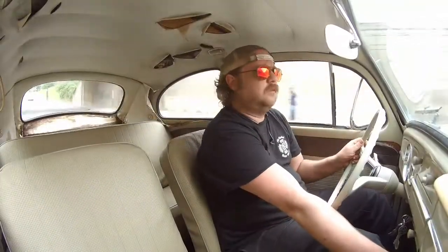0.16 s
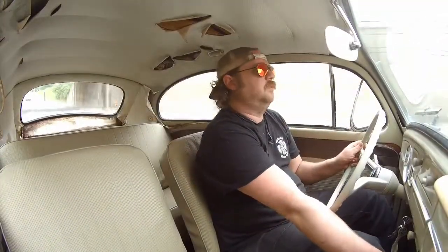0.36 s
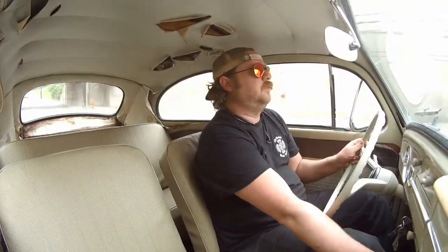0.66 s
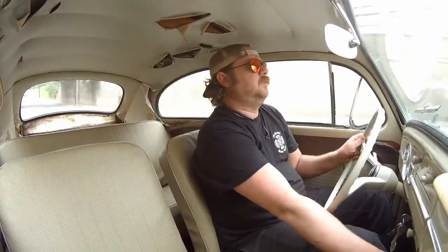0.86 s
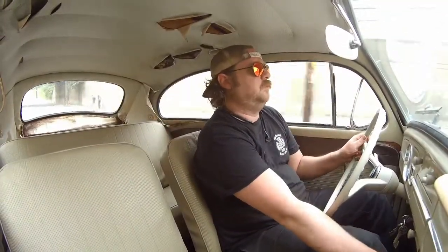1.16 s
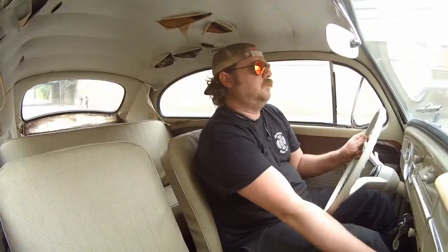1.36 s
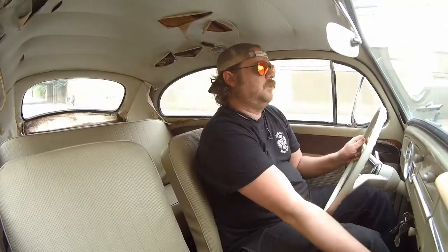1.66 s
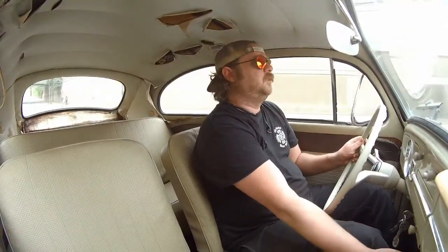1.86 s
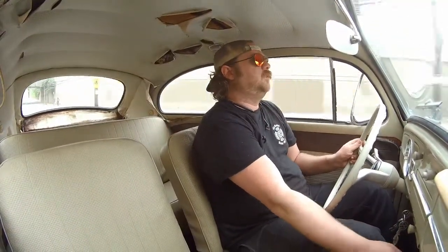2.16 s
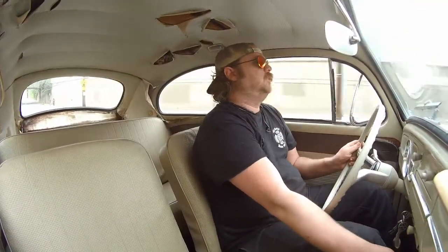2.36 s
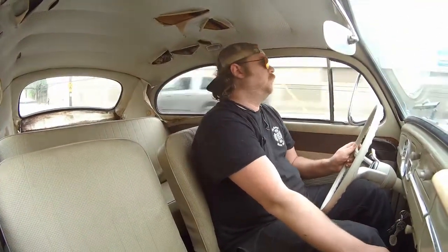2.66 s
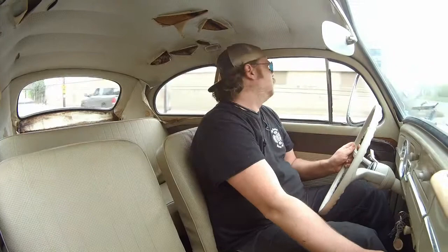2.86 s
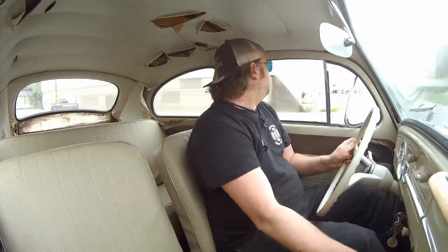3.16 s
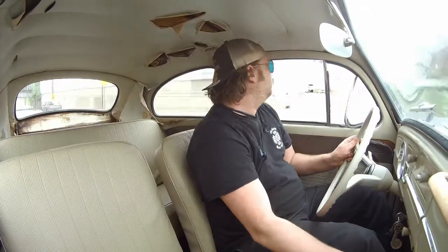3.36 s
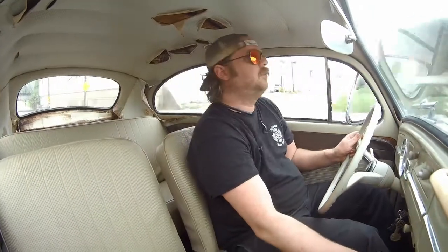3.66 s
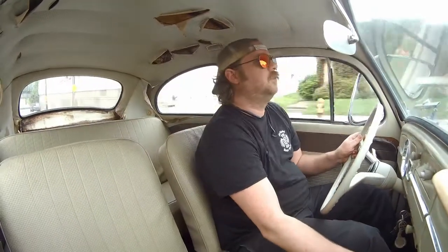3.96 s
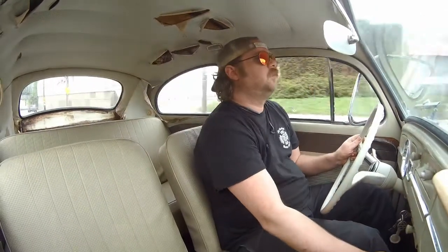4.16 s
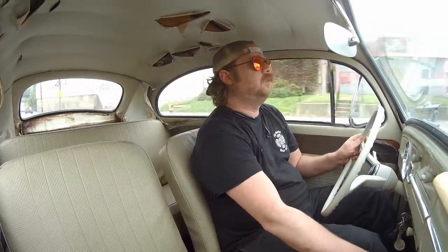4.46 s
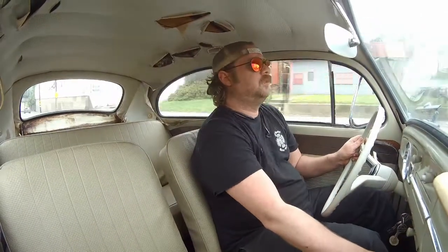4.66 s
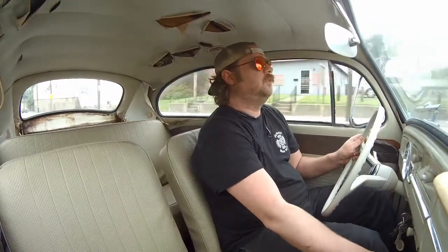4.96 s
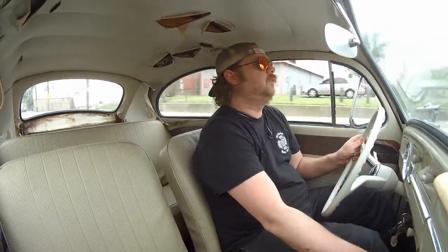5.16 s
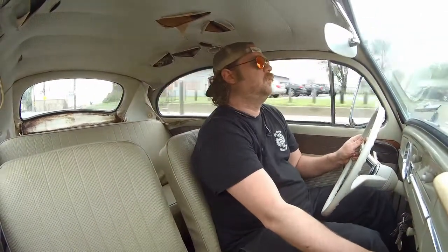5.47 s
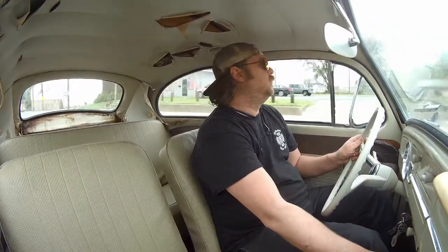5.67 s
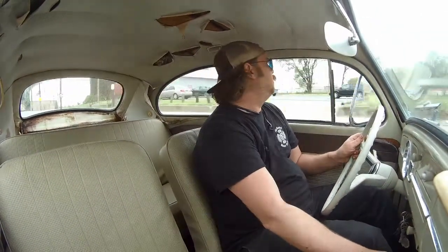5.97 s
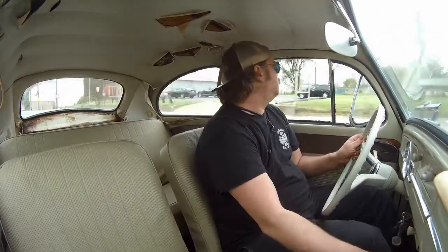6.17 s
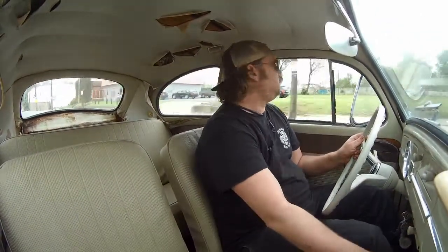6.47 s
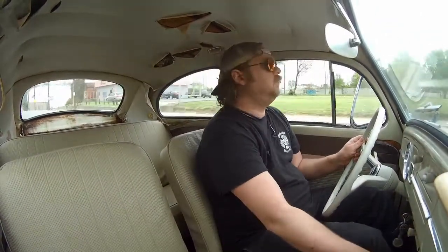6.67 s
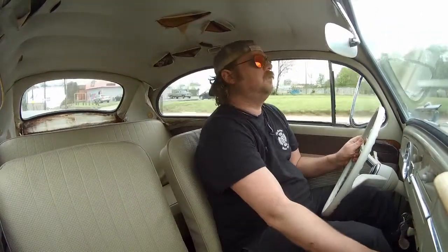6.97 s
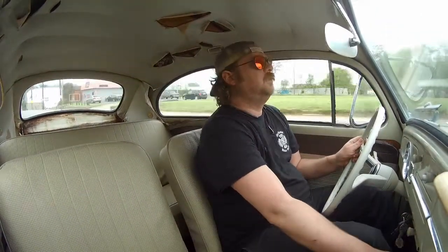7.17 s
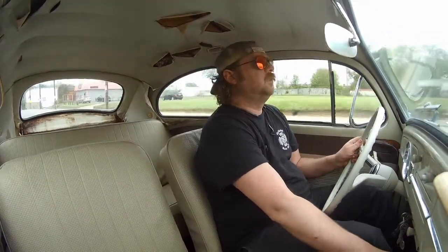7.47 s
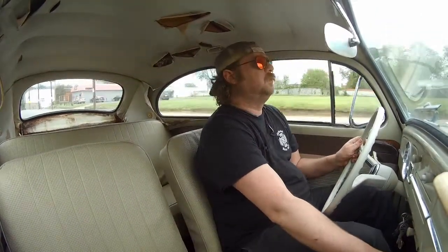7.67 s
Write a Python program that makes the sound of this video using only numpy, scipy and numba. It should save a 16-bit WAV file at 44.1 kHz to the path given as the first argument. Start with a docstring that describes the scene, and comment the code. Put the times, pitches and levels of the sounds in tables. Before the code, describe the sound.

Inside an old air-cooled car at road speed, low wind buffeting and tyre roar surround a droning engine that eases down in pitch.

```python
"""Inside an old air-cooled car at road speed: buffeting wind, tyre roar and window hiss, all filtered noise.
The flat-four, sines on orders of its cycle, cruises to 2.7 s, coasts losing revs, pulls lightly and lumpily
from 4.2 s, then coasts down smoothly from 5.8 s to the end; a thin whine follows its speed throughout.
Up to 3.2 s pressure surges now and then pin the microphone and fine detail drops out for a few ms.
Roar and hiss swell as walls, verges and traffic go by, and dip briefly together."""
import sys
import numpy as np
from scipy import signal
from scipy.fft import rfft, irfft, next_fast_len
from scipy.io import wavfile
from scipy.ndimage import uniform_filter1d
from numba import njit

SR = 44100
rng = np.random.default_rng(int(sys.argv[2]) if len(sys.argv) > 2 else 0)


def store_pcm(level_fs):
    """Save levels as 16-bit WAV."""
    pcm = np.round(np.clip(level_fs, -1, 1) * 32767).astype(np.int16)
    wavfile.write(sys.argv[1], SR, np.atleast_2d(pcm).T)


N = 345303


def undb(db):
    """Decibels to amplitude gain."""
    return 10 ** (np.asarray(db) / 20)


def curves(table):
    """Each column of a table after its time column, interpolated sample by sample."""
    time_s, *columns = np.transpose(table)
    return [np.interp(np.arange(N) / SR, time_s, column) for column in columns]


def walk(rate_hz, step=1):
    """Random levels held 1 / rate_hz and slewed twice; spread 1; one value every step samples."""
    hold = int(SR / step / rate_hz)
    count = len(range(0, N, step))
    held = np.repeat(rng.standard_normal(count // hold + 1), hold)
    slewed = uniform_filter1d(uniform_filter1d(held, hold), hold)[:count]
    return slewed / slewed.std()


def lift(hz, rings):
    """Summed dB lift of a set of resonances."""
    return sum(lift_db / (1 + (2 * (hz - ring_hz) / width_hz) ** 2) for ring_hz, width_hz, lift_db in rings)


def noise(colour, flicker_db, rate_hz, rings=()):
    """Coloured noise of rms 1 in overlapping octave bands that each flicker alone."""
    size = next_fast_len(N)
    hz = np.arange(1, size // 2 + 2) * SR / size
    colour_hz, colour_db = np.array(colour).T
    db = np.interp(np.log(hz), np.log(colour_hz), colour_db, left=-99, right=-99) + lift(hz, rings)
    spectrum = undb(db) * rfft(rng.standard_normal(size))
    octave = np.log2(hz)
    out = 0
    for centre in np.arange(np.floor(np.log2(colour_hz[0])), np.log2(colour_hz[-1]) + 1):
        share = np.clip(1 - abs(octave - centre), 0, 1)
        band = irfft(spectrum * share, size)[:N]
        out = out + undb(flicker_db * walk(rate_hz)) * band
    return out / out.std()


def throttle():
    """Shares of shut (coasting), light pull and steady cruise, summing to 1."""
    # start_s, pull_share, cruise_share
    throttle_shares = [(0, 0, 1), (2.74, 0, 1), (2.88, 0, 0), (4.03, 0, 0), (4.2, 1, 0), (5.74, 1, 0),
                       (5.82, 0, 0), (7.83, 0, 0)]
    pull, cruise = curves(throttle_shares)
    return 1 - pull - cruise, pull, cruise


def revs():
    """Engine cycle rate (two crank turns per cycle) and its running phase in radians."""
    # start_s, cycle_hz: holds at cruise and under light pull, sags when coasting
    rev_points = [(0, 32.43), (.4, 32.29), (1.8, 32.84), (2.65, 32.4), (4.1, 29.7), (4.6, 29.42),
                  (5.0, 29.21), (5.75, 29.16), (7.0, 26.97), (7.83, 25.85)]
    cycle_hz, = curves(rev_points)
    return 2 * np.pi * np.cumsum(cycle_hz) / SR, cycle_hz


def engine(cycle, cycle_hz):
    """Orders of the cycle; uneven cylinders on throttle fill in the orders between the firings."""
    # order (firing note is 4), shut_db, pull_db, cruise_db; rms before booms and slow build
    order_levels = [(2, -25.5, -26, -38), (4, -25, -28, -25), (5, -36.5, -26.5, -42),
                    (6, -34.5, -27.5, -31.5), (7, -43.5, -29, -37.5), (8, -35, -33.5, -45),
                    (9, -57, -30.5, -30.5), (10, -44, -40, -68), (11, -53, -45, -45), (12, -38, -43, -40),
                    (13, -42, -38, -38), (14, -55, -42, -46), (15, -42, -45.5, -43), (16, -52, -45, -45),
                    (17, -55, -57, -40), (19, -47.5, -43, -42), (20, -65, -53, -42.5),
                    (21, -46, -49.5, -41.5), (22, -44.5, -44, -43), (23, -66, -47, -47)]
    # cabin air and panel booms that the orders slide through: ring_hz, width_hz, lift_db
    booms = [(105.99, 14.4, 3.5), (155.3, 13.4, 3), (192.3, 10, 1.5), (228.5, 21.3, 8.5), (294, 7.5, 3),
             (385, 9.7, 4.5), (436, 14, 3.5)]
    # orders that start weak as the pull begins: order, initial_shortfall_db
    slow_orders = [(4, 10), (5, 2), (6, 3), (7, 13), (8, 2), (9, 6.5)]
    pull_from_s, build_s = 4.2, 0.45
    step = 8  # no treble here, so drawn at an eighth of the sample rate

    shut, pull, cruise = (share[::step] for share in throttle())
    cycle_hz = cycle_hz[::step]
    cycle = cycle[::step] + 0.035 * walk(6., step)  # crank hunts a little (radians of cycle)
    short_db = dict(slow_orders)
    pull_age_s = np.maximum(np.arange(0, N, step) / SR - pull_from_s, 0)
    unbuilt = np.exp(-pull_age_s / build_s)
    out = 0
    for order, shut_db, pull_db, cruise_db in order_levels:
        built_db = pull_db - short_db.get(order, 0) * unbuilt
        gain = shut * undb(shut_db) + pull * undb(built_db) + cruise * undb(cruise_db)
        gain = gain * undb(lift(order * cycle_hz, booms) + 0.99 * walk(7., step))
        chirp = .5 * order ** 2  # radians; higher orders arrive later, so each cycle is a rising chirp
        out = out + gain * np.sqrt(2) * np.sin(order * cycle - chirp)
    for order in range(24, 44):  # faint clatter orders of valves and gears
        db = -46. - 0.76 * (order - 24) + 1.5 * rng.standard_normal()
        db = db + 1.0 * (pull + cruise) + 3.6 * walk(2.984, step)
        out = out + undb(db) * np.sin(order * cycle + 2 * np.pi * rng.random())
    return signal.resample_poly(out, step, 1)[:N]


def whine(cycle, cycle_hz):
    """A thin wavering tone locked to engine speed, likely the belt-driven cooling fan in a ringing shroud."""
    # shroud resonance: ring_hz, width_hz, lift_db
    shroud = [(3125, 80, 6)]
    # shut_db, pull_db, cruise_db; rms before shroud and waver
    whine_levels = (-62.5, -65.5, -63)
    order = 104.5
    waver = undb(2.5 * walk(9.) + lift(order * cycle_hz, shroud))
    gain = sum(share * undb(db) for share, db in zip(throttle(), whine_levels))
    phase_wander_rad = 2. * walk(12.)
    return gain * waver * np.sqrt(2) * np.sin(order * cycle + phase_wander_rad)


def buffet(level_db):
    """Wind beating on the cabin: very low noise in random gusts."""
    # pitch_hz, relative_level_db
    buffet_colour = [(9, -32), (16, -5.5), (27, 2), (40, -1.5), (52, -23.5), (90, -17)]
    gust_db, gusts_hz = 1.5, 10.
    return undb(level_db + gust_db * walk(gusts_hz)) * noise(buffet_colour, 0.2, 3.04)


def rumble(level_db):
    """Road rumble: low noise whose octaves flicker."""
    # pitch_hz, relative_level_db
    rumble_colour = [(30, 0.5), (48, -1.5), (78, 3.5), (105, -4.5), (200, -13), (400, -27.5)]
    return undb(level_db) * noise(rumble_colour, 1.06, 11.)


def roar(level_db, cycle):
    """Tyres and drivetrain through the floor; the engine's share throbs with cycle, crank and firing."""
    # pitch_hz, relative_level_db
    roar_colour = [(60, 0.5), (150, 2), (300, 4), (420, 0.5), (520, -0.5), (650, -2.5), (830, -1.5),
                   (1000, -3.5), (1280, -6.5), (1500, -12.5), (1750, -24.5), (2600, -30.5)]
    # floor-pan resonances: ring_hz, width_hz, lift_db
    pan = [(436, 36, 6), (527.6, 18, 5), (653, 27, 7.5), (826, 43, 2.5), (987, 36, 3), (1250, 33, 3)]
    throb = 1 + 0.025 * np.cos(cycle) + 0.031 * np.cos(2 * cycle)
    throb = throb + 0.12 * np.cos(4 * cycle) + 0.057 * np.cos(6 * cycle)
    return undb(level_db) * throb * noise(roar_colour, 0.57, 7., pan)


def hiss(level_db, bright_db):
    """Air tearing past the window edges in quick eddies that lift the whole treble."""
    # pitch_hz, relative_level_db
    hiss_colour = [(1200, -3), (2000, -3.5), (2800, -5), (3800, -4.5), (4100, -12), (4700, -10.5),
                   (5200, -15.5), (6000, -11.5), (9400, -14.5), (12500, -16.5), (14900, -23)]
    # cabin trim and microphone housing: ring_hz, width_hz, lift_db
    trim_rings = [(2350, 81, 6), (3490, 260, 1.5), (4520, 200, 2.5), (6430, 500, 1), (8220, 600, 3),
                  (10500, 600, 2)]
    eddies_db = 0.3 * walk(45.) + 0.33 * walk(150.)
    air = noise(hiss_colour, 0.13, 23.0, trim_rings)
    dull = signal.sosfiltfilt(signal.butter(2, 5500, fs=SR, output="sos"), air)
    return undb(level_db + eddies_db) * (dull + undb(bright_db) * (air - dull))


def dips():
    """Summed dB of brief level dips: a quick fall, a slower return."""
    # centre_s, depth_db (negative is a rise), before the scaling for roar
    dip_points = [(.2, 1.5), (1.11, 4), (1.51, 6.5), (1.81, 1.5), (2.11, 5), (2.85, 1), (3.17, 0.5),
                  (4.76, 0.5), (5.47, 2), (5.64, -0.5), (6.18, 4), (6.7, 1.5), (7.04, -0.5)]
    fall_s, recover_s = 0.0095, 0.04  # time constants
    out_db = np.zeros(N)
    for centre_s, depth_db in dip_points:
        late_s = np.arange(N) / SR - centre_s
        out_db -= depth_db * np.exp(-np.where(late_s < 0, -late_s / fall_s, late_s / recover_s))
    return out_db


def scene():
    """All sources as they reach the dashboard."""
    # swells as walls, verges and traffic go by; base levels, offset below:
    # start_s, hiss_db, hiss_top_db, roar_db
    rush = [(0, -46, -7, -32), (1.1, -44.5, -7, -30.5), (1.45, -43.5, -6, -28.5), (2.0, -44, -7, -31),
            (2.5, -43, -7.5, -30.5), (3.1, -44, -5, -29), (3.5, -45, -6.5, -33.5), (4.1, -43, -7.5, -28.5),
            (4.45, -41.5, -8, -28), (4.9, -46, -9, -32.5), (5.4, -45, -6.5, -29), (5.8, -42, -15, -32),
            (6.15, -42, -8, -25.5), (6.45, -45, -8, -30), (7.35, -44, -8.5, -28.5), (7.83, -45.5, -9, -30)]
    # start_s, buffet_db, rumble_db
    lows = [(0, -15.5, -19), (.75, -17.5, -21.5), (1.7, -15, -20), (2.5, -18, -19.5), (3.4, -13, -20),
            (3.75, -16.5, -19.5), (4.1, -16.5, -18.5), (4.95, -14.5, -21.5), (5.55, -20, -22),
            (6.35, -15.5, -18), (6.9, -19, -18.5), (7.83, -16.5, -19.5)]
    top_share_db = -7.5  # the hiss_top_db that leaves the hiss colour unchanged
    roar_lift_db = 4  # raises the whole roar
    surge_db, surge_hz = .6, 14.  # quick surges shared by roar and hiss, before the scaling for roar

    cycle, cycle_hz = revs()
    hiss_db, top_db, roar_db = curves(rush)
    buffet_db, rumble_db = curves(lows)
    shared_db = surge_db * walk(surge_hz) + dips()
    motor = engine(cycle, cycle_hz) + whine(cycle, cycle_hz)
    low = buffet(buffet_db) + rumble(rumble_db)
    road = roar(roar_db + roar_lift_db + 1.45 * shared_db, cycle)
    air = hiss(hiss_db + shared_db, top_db - top_share_db)
    return (motor + low + road + air)[None]


@njit
def follow(x, attack, release):
    """Peak follower: quick to rise, slow to fall."""
    out, level = np.empty(len(x)), 0.
    for i in range(len(x)):
        level += (x[i] - level) * (attack if x[i] > level else release)
        out[i] = level
    return out


def record(dry):
    """A pinned diaphragm passes only the slow swing; a limiter ducks after big swings and the top is cut."""
    # microphone pinned by pressure surges: start_s, length_ms (edges smoothed below)
    pinned = [(0.1666, 10.8), (0.4954, 6.0), (0.5027, 1.0), (0.6299, 1.0), (0.9448, 3.0), (0.949, 1.5),
              (0.9513, 2.2), (1.4762, 1.3), (1.4776, 4.0), (1.933, 2.1), (2.0702, 1.6), (2.3629, 2.8),
              (3.1642, 3.8), (3.1872, 2.0), (3.1901, 6.2)]
    free = np.ones(N)
    for start_s, length_ms in pinned:
        free[int(start_s * SR):int((start_s + length_ms / 1000) * SR)] = 0
    free = uniform_filter1d(uniform_filter1d(free, size=12), size=12)
    swing = signal.sosfiltfilt(signal.butter(3, 150, fs=SR, output="sos"), dry)
    heard = swing + free * (dry - swing)

    attack_s, release_s = .001, .06
    peak = follow(abs(heard[0]), 1 / (attack_s * SR), 1 / (release_s * SR))
    limited = heard * np.minimum(1, .52 / (peak + 1e-9)) ** .7
    rounded = limited / (1 + (limited / .76) ** 8) ** (1 / 8)  # soft ceiling at .76
    top_hz = 15030
    return signal.sosfilt(signal.ellip(10, .2, 80, top_hz, fs=SR, output="sos"), rounded)


dry = scene()
out = record(dry)
store_pcm(out)
```